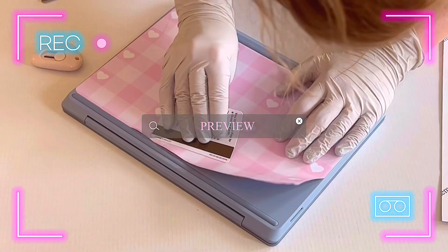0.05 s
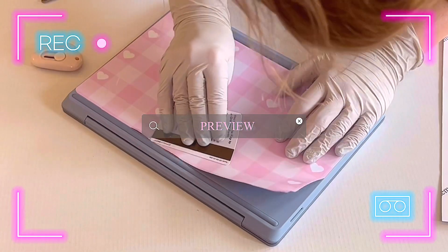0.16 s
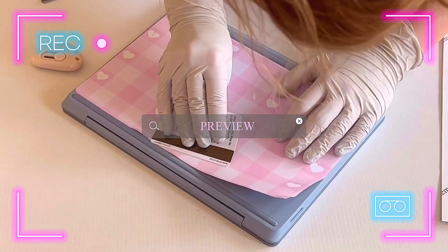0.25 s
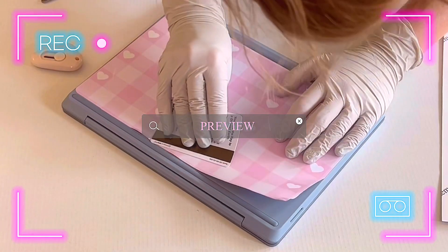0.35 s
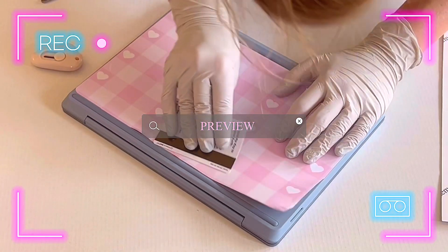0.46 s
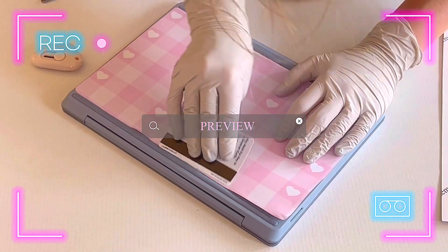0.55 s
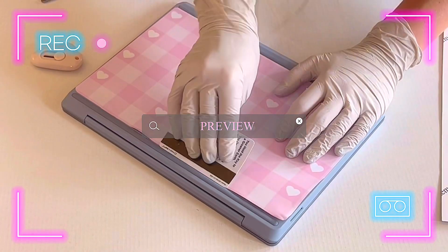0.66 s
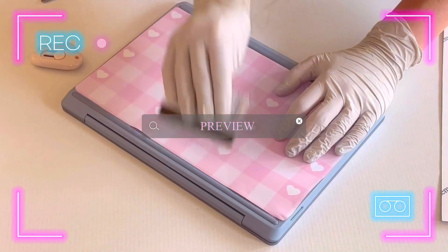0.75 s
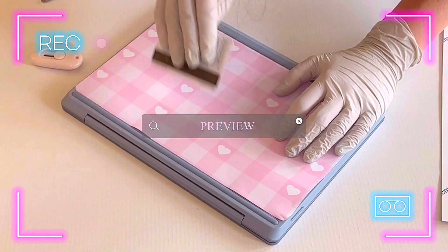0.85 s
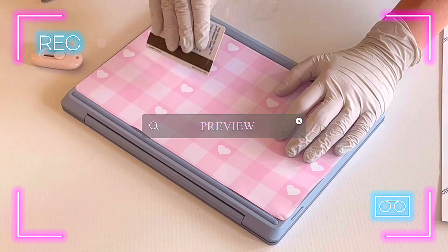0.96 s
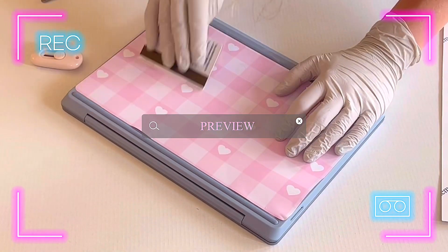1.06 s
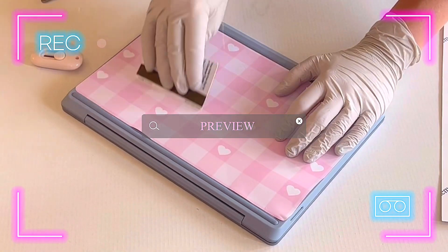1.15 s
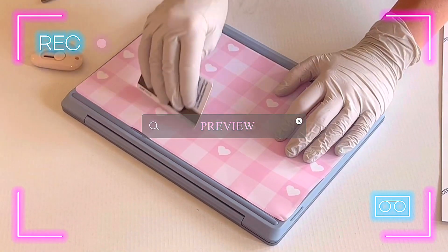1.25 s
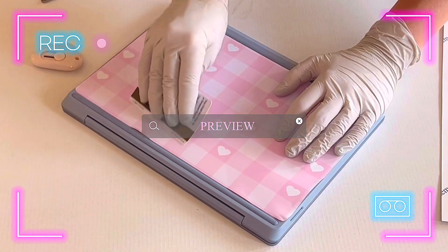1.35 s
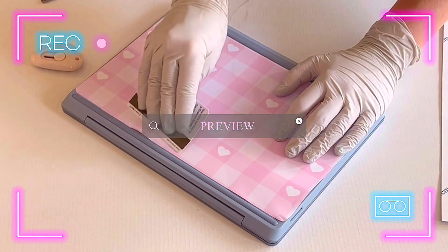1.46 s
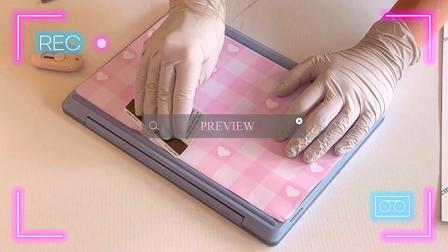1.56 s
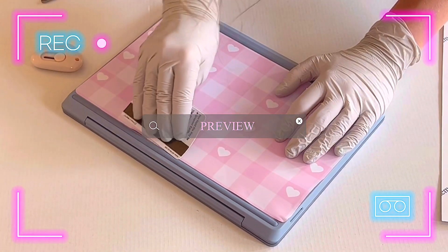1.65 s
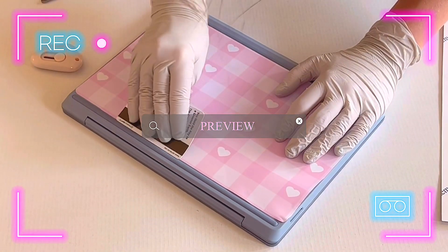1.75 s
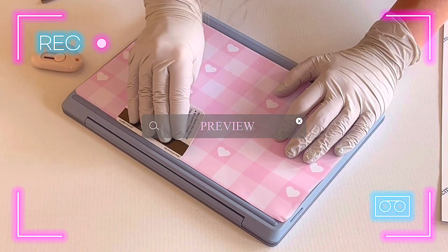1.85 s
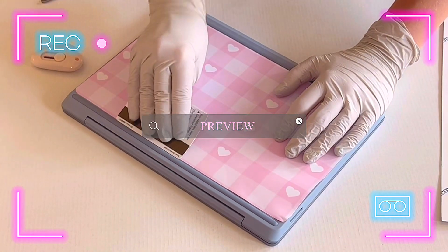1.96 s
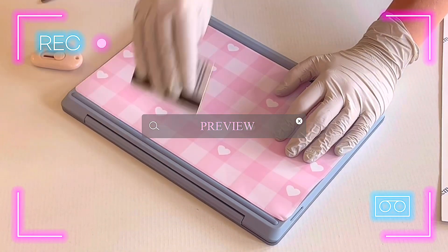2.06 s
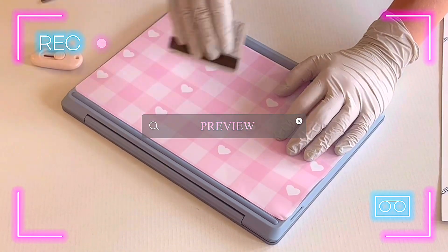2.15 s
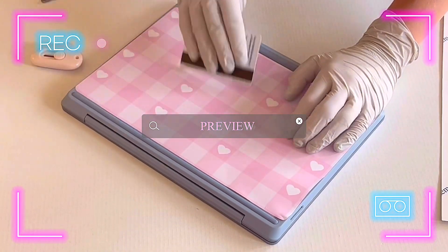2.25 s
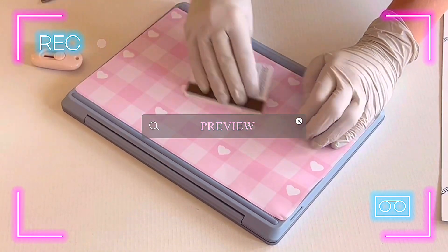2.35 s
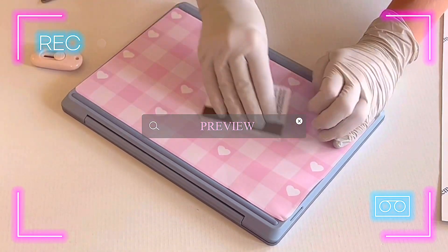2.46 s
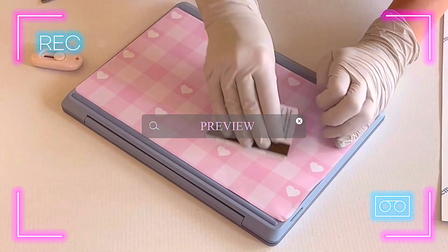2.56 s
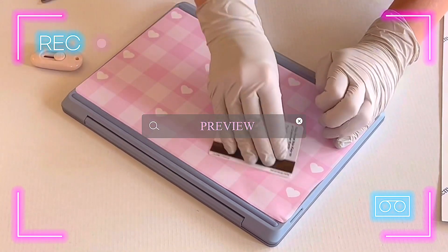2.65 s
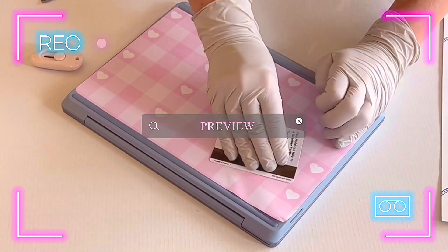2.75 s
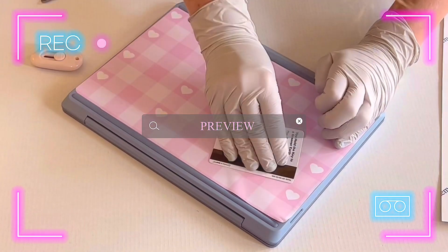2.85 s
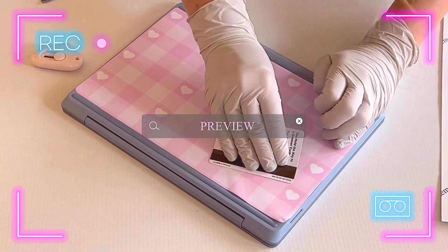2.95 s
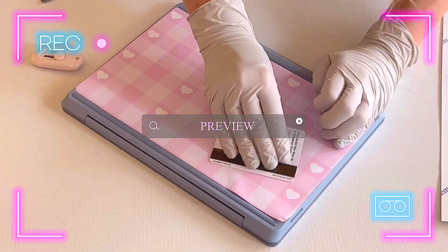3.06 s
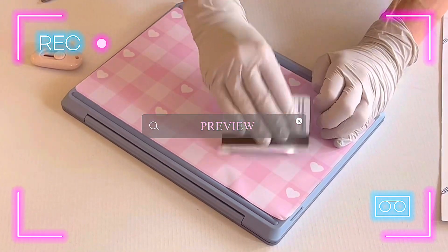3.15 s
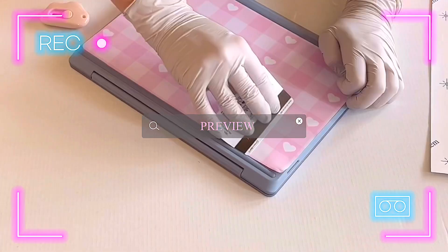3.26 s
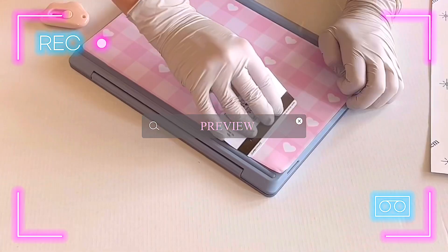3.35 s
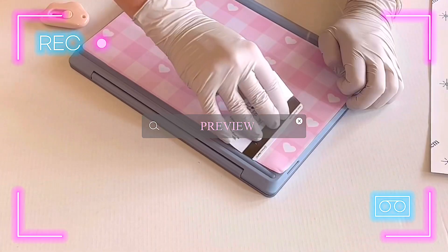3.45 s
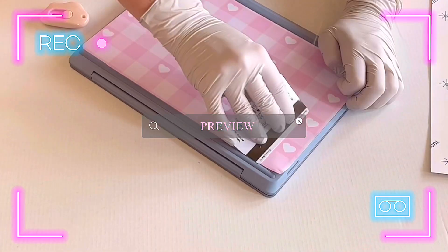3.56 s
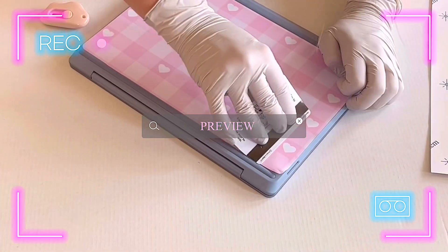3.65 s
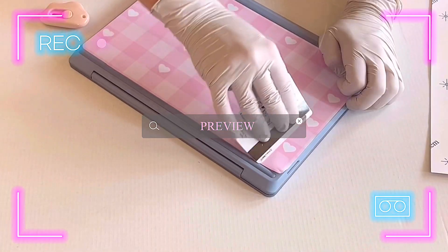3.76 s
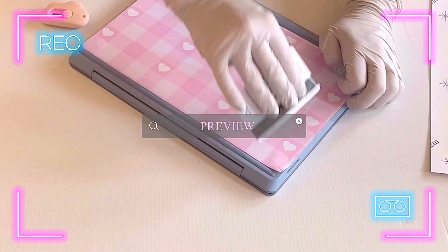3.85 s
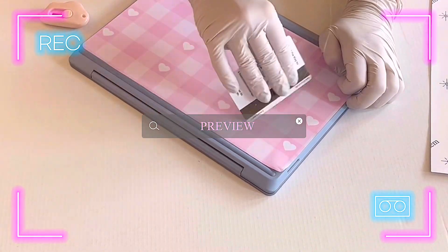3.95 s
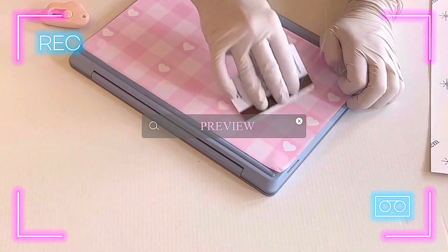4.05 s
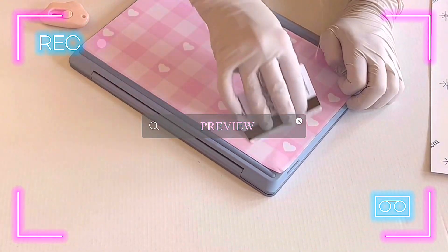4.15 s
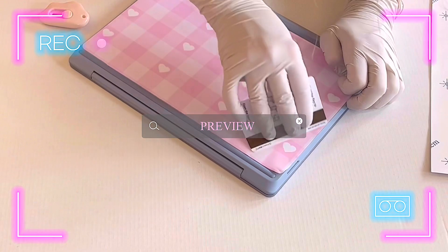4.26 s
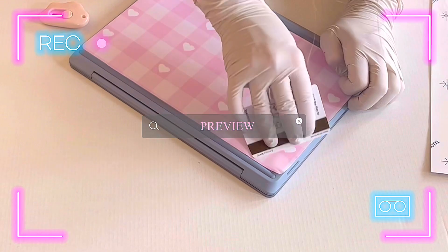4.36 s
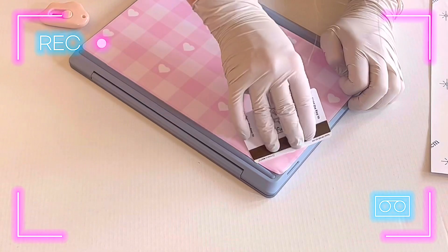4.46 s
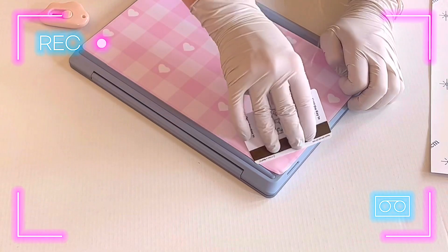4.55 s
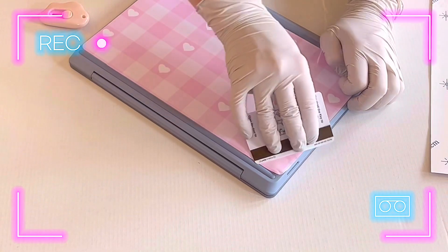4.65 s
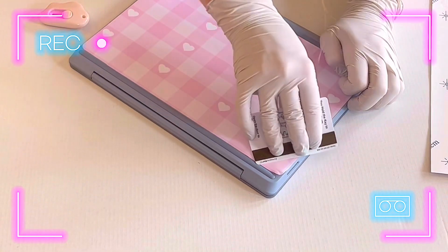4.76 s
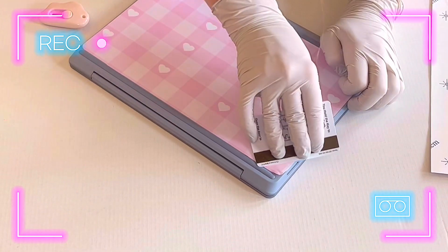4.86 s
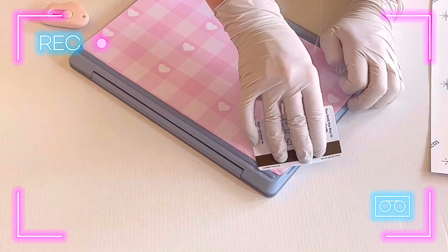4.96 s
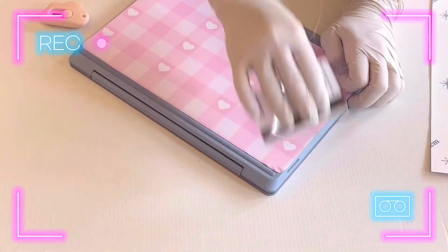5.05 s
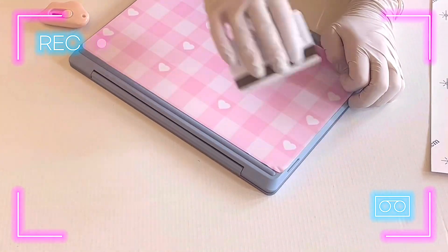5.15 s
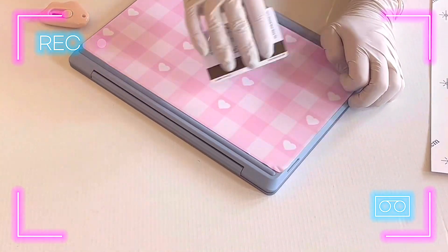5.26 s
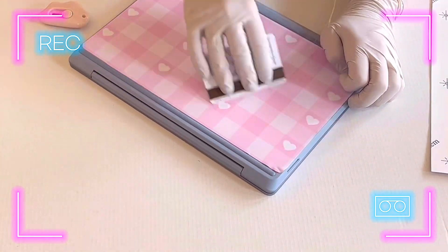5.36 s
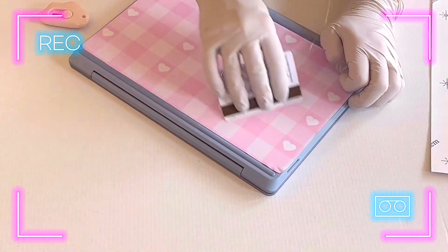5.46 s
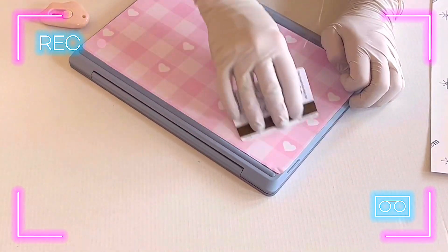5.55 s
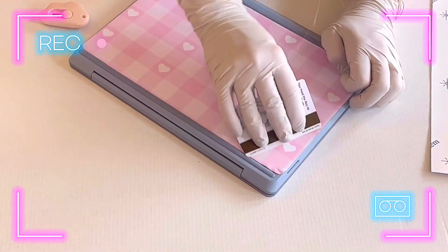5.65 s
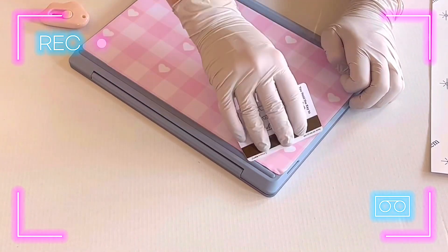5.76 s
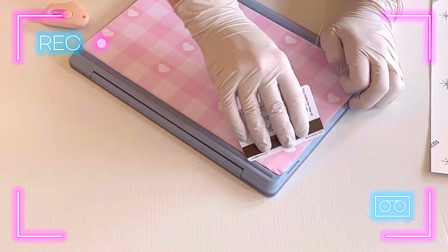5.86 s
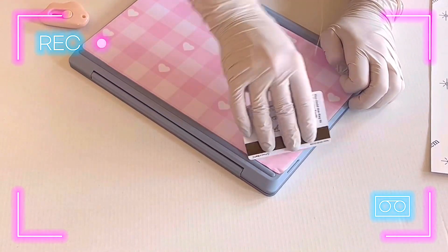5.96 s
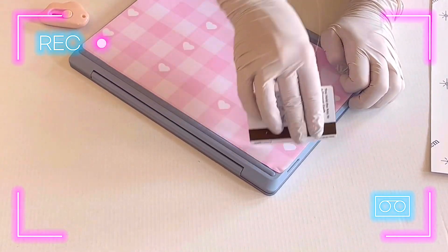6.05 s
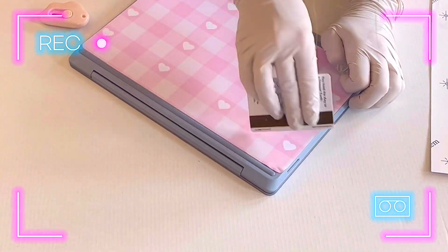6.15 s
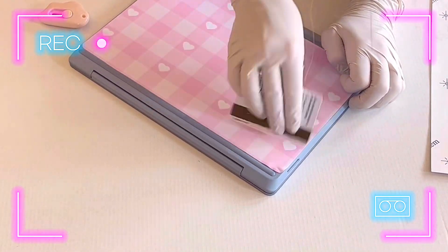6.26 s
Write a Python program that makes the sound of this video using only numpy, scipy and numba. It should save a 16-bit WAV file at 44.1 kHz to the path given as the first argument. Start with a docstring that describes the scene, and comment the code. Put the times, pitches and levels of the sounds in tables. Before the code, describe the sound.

Close up in a small room, a thin plastic card smooths vinyl onto a laptop lid. After a barely audible squeaky press, the loose film slaps shut with a small hollow knock. Then come short hissing scrapes, some hollow and some bright, separated by light flicks and hard little taps, with quieter rubbing between stronger sweeps. A low, slightly wavering appliance hum runs underneath. Close stereo pickup from above, with short reflections.

```python
"""Over a low hum, a faint squeaky press; then a plastic card smooths a vinyl skin onto a laptop lid:
it taps down, scrapes across in short strokes and flicks off, while a loose end of vinyl slaps shut.
Random micro-slips of the edge ring card and lid as resonances; taps and slaps are decaying modes.
A small room with a humming appliance adds echoes from desk and walls, still air and wavering tones;
a phone with two close microphone ports listens from above."""
import sys
import numpy as np
from scipy import signal
from scipy.fft import rfft, irfft, next_fast_len
from scipy.io import wavfile
from scipy.ndimage import uniform_filter1d
from numba import njit

SR = 44100
rng = np.random.default_rng(int(sys.argv[2]) if len(sys.argv) > 2 else 0)


def waveform_to_disk(signal):
    """Save audio, clipped to [-1, 1], as 16-bit WAV at the path in sys.argv[1]."""
    frames = np.transpose(np.atleast_2d(signal))
    scaled = np.clip(frames, -1, 1) * 32767
    samples = np.round(scaled).astype(np.int16)
    wavfile.write(sys.argv[1], SR, samples)


N = 278271
T = np.arange(N) / SR  # time in seconds


def undb(db):
    """Decibels to gain."""
    return 10 ** (np.asarray(db) / 20)


def unit(x):
    """Scale to rms 1."""
    return x / np.sqrt(np.mean(x ** 2))


def colour(points, hz):
    """Level in dB of a spectrum, drawn straight between its points over log frequency."""
    point_hz, point_db = np.transpose(points)
    return np.interp(np.log(hz), np.log(point_hz), point_db)


def bump(hz, centre_hz, width_hz):
    """Bell shape of one resonance, top 1."""
    return 1 / (1 + (2 * (hz - centre_hz) / width_hz) ** 2)


def shape(x, gain):
    """Filter by a gain that is a function of frequency."""
    size = next_fast_len(x.shape[-1] + 2048)
    hz = np.maximum(np.arange(size // 2 + 1) * SR / size, 1)
    return irfft(rfft(x, size) * gain(hz), size)[..., :x.shape[-1]]


def walk(rate):
    """Slow random wander with a spread near 1: random steps at the given rate (Hz), smoothed twice."""
    k = int(SR / rate)
    steps = np.repeat(rng.standard_normal(N // k + 1), k)
    return np.sqrt(2) * uniform_filter1d(uniform_filter1d(steps, k), k)[:N]


def slips(spread_db, judder_db, judder_rate):
    """Dense micro-slips of unequal size, bunched by the judder of the edge."""
    sizes = rng.standard_normal(N) * undb(spread_db * rng.standard_normal(N))
    return unit(sizes * undb(judder_db * walk(judder_rate)))


def ring(modes, t, detune):
    """Decaying modes of a struck body, each shifted a little in pitch at each blow."""
    total = 0
    for hz, db, t60 in modes:
        pitch_hz = hz * (1 + detune * rng.standard_normal())
        decay = np.exp(-np.log(1000) * t / t60)
        total = total + undb(db) * decay * np.sin(2 * np.pi * pitch_hz * t)
    return total


def effort(t, rise, hold, slowing, swell_db, rise_power=2.13, ease_s=0.0098):
    """Level in dB of one push: it gathers speed, changes by the swell over the hold, then slows."""
    attack = np.sin(np.pi / 2 * np.clip(t / rise, 1e-3, 1)) ** rise_power
    to_go = np.clip((rise + hold - t) / hold, 0, 1)
    past = np.maximum(t - rise - hold, 0)
    # the slowing eases in rather than starting with a corner
    slowed_s = np.hypot(past, ease_s) - ease_s
    return 20 * np.log10(attack) - swell_db * to_go ** 2 - slowing * slowed_s


def scrape(lid_hz=1400, hiss_hz=4600, lid_db=-3.0, card_db=-1.8, hiss_db=-0.96,
           near_s=0.0009, far_s=.00321, travel=0.001546, rim_echo=.24,
           rumble_hz=350, grit_hz=11000, apart_db=-8, apart_hz=4000,
           lid_per_db=0.74, hiss_per_db=1, lean_lid_db_per_s=12.5, lean_hiss_db_per_s=-15,
           ring_width_hz=18, ring_db=1.5):
    """Each push rings the lid below, the card in the middle and hisses on top; friction drives all three."""
    # colour of the sliding edge: hz, level_db
    edge_colour = [(200, -16.5), (450, -8), (620, -8.2), (780, -5), (1000, -2.5), (1400, -3), (2500, 2.5),
                   (3700, 1), (4900, -4.5), (6200, -1), (7500, -14), (10000, -19.5), (12000, -21.3),
                   (15500, -22.5)]
    # resonances of card and lid under the sliding edge: centre_hz, width_hz, height_db
    resonances = [(690, 100, -0.5), (1320, 260, 2), (1830, 280, 4), (2020, 100, -1), (3090, 320, 1.5),
                  (4700, 340, 0.5), (6060, 1050, -5.5)]
    # narrow rings of the lid, the same under every stroke: centre_hz
    rings_hz = [1296, 1481, 1605, 1713, 1820, 2234, 2393, 2990, 3402, 3782, 3947, 4606]
    # where and how the edge presses, by name: lid_resonance_hz, its height_db, card_resonance_hz,
    # its height_db, lid_rumble_db, finest_grit_db, left_over_right_db
    contacts = { "first press": (1560, 5, 3750, 6, -13.5, 7, 1.5),
                "laying down": (1333, 12, 3101, 2.5, -6, 7, 1),
                "long sweep, upright": (1202, 3, 2950, 2, -7, 14, 1),
                "long sweep": (1202, 2, 1530, 4, -6.5, 5.5, 1.5),
                "hinge side": (1450, 11, 3070, 6.5, 6.8, 1.7, 2),
                "middle sweep, upright": (1600, 2, 3300, 3, 6, 13, 0.5),
                "middle sweep": (1438, 3, 2050, -2, 1, 5.5, 0),
                "front rim": (830, 8, 1860, 4.8, 10, -1, 0.5),
                "side sweep": (2046, 2.5, 3880, 8.5, -1, 3.5, -0.4),
                "slow rub": (1366, 5.5, 3700, 6.5, 7, -5, 0),
                "off the corner": (520, 15, 4600, 14, 14, 21, 2),
                "corner sweep": (920, -2.5, 3820, 4.5, -3.5, 3.5, -0.2),
                "corner press": (1252, 5.5, 1750, 6.5, 16, 10, 0),
                "last touch": (670, 9.3, 1400, 8.2, 6.7, 9.1, 1), }
    # each push of the card: contact name, start_s, rise_s, hold_s, slowing_db_per_s, level_db,
    # swell_over_hold_db, lid_re_level_db, hiss_re_level_db
    pushes = [ ("first press", 0, .01, 0.14, 190, -76, -0.92, -8, -11.5),
              ("laying down", .356, 0.14, 0.067, 470, -59, 3.1, -8, -10.5),
              ("laying down", 0.57, 0.0083, 0.023, 290, -68, 0, 2.4, -22),
              ("long sweep, upright", 1.004, .003, .012, 150, -60, 0, -4.5, -9),
              ("long sweep, upright", 1.0064, 0.048, 0.017, 134, -51.5, 1, -16.5, -2.8),
              ("long sweep", 1.087, 0.091, 0.082, 260, -49.5, 3.1, -0.59, -13.5),
              ("long sweep", 1.2245, 0.062, 0.013, 143, -46.5, 0, -8.5, -8),
              ("hinge side", 1.37, 0.051, 0.12, 330, -58.5, 2.4, -1, -15.5),
              ("hinge side", 1.51, .02, .01, 330, -60, 0, -8, -16),
              ("hinge side", 1.617, 0.064, 0.03, 470, -59, 2.1, -2, -17),
              ("middle sweep, upright", 2.255, .035, .015, 95, -56, 0, -14.5, 1.3),
              ("middle sweep", 2.2474, 0.0048, 0.34, 178, -47.5, 11.2, -11, -7),
              ("front rim", 3.204, 0.007, 0.012, 148, -61, 0, 3.1, -11.5),
              ("front rim", 3.319, 0.1, 0.122, 360, -61.6, 0, 1.5, -11.5),
              ("side sweep", 3.963, 0.01, 0.038, 100, -67.5, .5, 6.7, -5.5),
              ("side sweep", 4.027, 0.062, 0.095, 190, -43, 3.1, -14.5, -12.5),
              ("side sweep", 4.177, .133, .052, 303, -51.5, 3.2, -2.2, -13.5),
              ("slow rub", 4.6, 0.082, 0.022, 92, -69, 0, -10, -12),
              ("slow rub", 4.784, 0.092, 0.094, 240, -69.5, .5, -15, -11),
              ("off the corner", 5.037, 0.0042, 0.01, 260, -68, 0, -1, -3.5),
              ("corner sweep", 5.328, 0.005, 0.23, 194, -45, 10.2, -12, -7),
              ("corner sweep", 5.55, 0.052, 0.026, 275, -47, 0, -11, -13.5),
              ("corner sweep", 5.61, 0.068, 0.018, 370, -57.5, 1, 0, -16.5),
              ("corner press", 5.821, 0.087, 0.019, 530, -61.5, 2.3, 0.6, -25),
              ("last touch", 6.215, 0.0045, 0.066, 270, -72, 0, 1, -6), ]
    out = np.zeros((2, N))
    own = shape(rng.standard_normal((2, N)), lambda f: 1 / np.hypot(1, (apart_hz / f) ** 2))
    for contact, start, rise, hold, slowing, level, swell, push_lid_db, push_hiss_db in pushes:
        hollow_hz, hollow_db, bite_hz, bite_db, rumble_db, grit_db, left_db = contacts[contact]
        friction = slips(spread_db=2.5, judder_db=0.8, judder_rate=260)
        span = (T >= start) & (T <= start + rise + hold + 50 / slowing)
        t = T[span] - start

        # waves return from two rims of the lid; the card leaves one and nears the other,
        # so the colour shifts; travel is seconds of echo lag per second since the contact began
        landed = min(row[1] for row in pushes if row[0] == contact)
        moved = travel * (T[span] - landed)
        near_echo = np.interp(T[span] - (near_s + moved), T, friction)
        far_echo = np.interp(T[span] - (far_s - moved), T, friction)
        x = friction[span] + rim_echo * (near_echo + far_echo)
        # the edge is long, so in the treble each port hears a part of it alone
        x = x + undb(apart_db) * own[:, :len(t)]

        modes = [*resonances, *((hz, ring_width_hz, ring_db) for hz in rings_hz),
                 (hollow_hz, hollow_hz / 2.5, hollow_db), (bite_hz, bite_hz / 5, bite_db),
                 (rumble_hz, rumble_hz, rumble_db), (grit_hz, grit_hz / 2, grit_db)]
        x = shape(x, lambda f: undb(colour(edge_colour, f)
                                    + sum(db * bump(f, hz, width) for hz, width, db in modes)))
        low = shape(x, lambda f: 1 / (1 + (f / lid_hz) ** 6))
        high = shape(x, lambda f: 1 / (1 + (hiss_hz / f) ** 10))
        middle = x - low - high

        # a slow edge sounds hollow, a fast one bright: the lid follows the push by less
        push_db = effort(t, rise, hold, slowing, swell)
        # the card leans over during a push, so the lid gains and the hiss fades
        lean_s = t - rise - hold
        lid_level = push_lid_db + lid_db + lid_per_db * push_db + lean_lid_db_per_s * lean_s
        hiss_level = push_hiss_db + hiss_db + hiss_per_db * push_db + lean_hiss_db_per_s * lean_s
        sound = (unit(low) * undb(lid_level)
                 + unit(middle) * undb(card_db + push_db)
                 + unit(high) * undb(hiss_level))
        out[:, span] += undb(level + np.array([[left_db], [-left_db]]) / 2) * sound
    return out


@njit
def band(x, hz, share):
    """Band-pass with a moving centre and a width that is a share of it; gain 1 at the centre."""
    y, b, l = np.empty(len(x)), 0., 0.
    for i in range(len(x)):
        g = np.tan(np.pi * hz[i] / SR)
        v = (b + g * (x[i] - l)) / (1 + g * (g + share))
        b, l, y[i] = 2 * v - b, l + 2 * g * v, share * v
    return y


def sweep(x, width=0.21):
    """Sliding resonances of the lid swell and fade as the edge travels over it."""
    # resonances sliding in pitch: start_s, end_s, first_hz, last_hz, height_db
    slides = [(1.063, 1.327, 2000, 910, 6), (1.15, 1.32, 950, 450, 3.5), (1.13, 1.36, 2700, 3400, 2),
              (2.252, 2.744, 3450, 1160, 5), (2.38, 2.72, 5800, 6940, 4.5), (3.055, 3.12, 3200, 2700, 3),
              (3.06, 3.125, 5400, 5900, 2.5), (3.21, 3.6, 3900, 4400, 2.5), (4.06, 4.194, 6600, 5800, 4.5),
              (4.12, 4.44, 3300, 2080, 3), (4.66, 5.02, 3200, 4600, 3), (5.468, 5.623, 5400, 4300, 3.5),
              (5.55, 5.76, 3200, 1990, 3)]
    out = x.copy()
    for start, end, first_hz, last_hz, db in slides:
        span = (T >= start) & (T < end)
        along = (T[span] - start) / (end - start)
        hz = first_hz * (last_hz / first_hz) ** along
        boost = (undb(db) - 1) * np.sqrt(np.abs(np.sin(np.pi * along)))
        out[:, span] += boost * np.array([band(port[span], hz, float(width)) for port in x])
    return out


def flicks(pivot_hz=3500):
    """Quick, light skids of the edge over the vinyl as the card lifts or turns: bright and gritty."""
    # each flick: start_s, rise_s, hold_s, fall_s (time constant), level_db, tilt_db_per_octave,
    # card_resonance_hz, its height_db
    flick_list = [(0.681, 0.019, 0.016, 0.014, -46.5, 0, 1450, 6),
                  (1.971, 0.019, 0.012, 0.016, -44.7, 1.8, 8000, 2),
                  (3.052, 0.022, 0.034, 0.009, -56.5, -3.2, 1800, 4),
                  (3.111, 0.014, .019, .009, -59.5, -2.4, 4500, 5.5),
                  (3.784, 0.014, 0.018, 0.0046, -69, -6, 2980, -1),
                  (3.805, 0.022, 0.007, 0.005, -57.5, 0.3, 4200, 7.5),
                  (4.422, 0.019, .008, .014, -67.5, -8, 5000, 10),
                  (4.659, 0.0036, 0.0071, 0.011, -65.5, -7, 3900, 15),
                  (5.031, .004, .001, .002, -54, 0, 4500, 5),
                  (5.99, 0.011, 0.026, .012, -61.3, -4, 1420, 6),
                  (6.037, 0.0082, .003, .004, -62, -5, 4070, 8),
                  (6.266, 0.01, 0.0056, 0.012, -49.8, -4, 2200, 5)]
    # colour of a flick: hz, level_db
    flick_colour = [(300, -32), (550, -17), (750, -11.5), (1000, -12.5), (1350, 0), (2150, -5.5), (2950, 3),
                    (3600, 1.5), (5500, 0), (6300, 2), (7200, -1.5), (9000, -3.5), (11000, -3), (15500, -9)]
    # clear of the lid, the card rings on briefly: centre_hz, width_hz, level_db
    free_rings = [(2980, 35, -8), (4250, 50, -11), (6350, 60, -6)]
    friction, out = slips(spread_db=3, judder_db=1.6, judder_rate=300), np.zeros(N)
    for start, rise, hold, fall, db, tilt, ring_hz, ring_db in flick_list:
        span = (T >= start) & (T < start + .5)
        t = T[span] - start
        speed = np.minimum(t / rise, 1) ** 2 * np.exp(-np.maximum(t - rise - hold, 0) / fall)
        # the tilt acts from 1 kHz up
        x = shape(friction[span], lambda f: undb(
            colour(flick_colour, f)
            + tilt * np.log2(np.maximum(f, 1000) / pivot_hz)
            + ring_db * bump(f, ring_hz, ring_hz / 8)))
        out[span] += undb(db) * speed * unit(x)
    return shape(out, lambda f: 1 + sum(undb(db) / (1 + 2j * (f - hz) / width)
                                        for hz, width, db in free_rings))


def taps(crack_db=-12, crack_s=0.0013, snap_db=-20, snap_s=0.0017, hard_hz=5000, card_low_hz=800,
         lid_lag_s=0.00097, spot_t60=.016):
    """Knocks of the edge: a crack and the card's short ring, dulled by a soft contact, over a lid thump."""
    # each tap: time_s, level_db, contact_cutoff_hz, lid_thump_db, card_pitch_factor,
    # contact_build_s, struck_spot_hz, struck_spot_db
    tap_list = [(1.0047, -35.5, 6000, -13, 0.97, 0.00083, 1700, -24),
                (2.2513, -36.5, 6100, -4.5, 1.2, 0.00062, 850, -18),
                (3.2078, -36.5, 4300, -5, 1.1, 0.0006, 780, -18),
                (3.833, -40, 6000, -22, 1.15, .0005, 1500, -26),
                (3.9624, -22.7, 5400, -17.5, 0.96, .0009, 1150, -25),
                (5.0361, -24, 5100, -23, 1.03, 0.00043, 1450, -28),
                (5.3302, -22, 5240, -13.5, 1.4, 0.00045, 500, -19),
                (6.2132, -33, 3600, -11.5, .92, 0.00062, 1400, -24)]
    # modes of the lid: hz, level_db, t60_s
    lid_modes = [(126, -17.5, 0.14), (194, -12.5, 0.031), (324, -19, 0.039), (397, -20.5, 0.038),
                 (538, -17.5, 0.032), (750, -11, 0.02), (943, -15, 0.04), (1260, -32, 0.006)]
    # modes of the card at pitch factor 1: hz, level_db, t60_s
    card_modes = [(1520, -11, 0.0051), (1850, -39, 0.0073), (2510, -7.5, 0.0029), (3310, -8.5, 0.0071),
                  (4140, -9, 0.0061), (6210, -12.5, 0.0051)]
    out, t = np.zeros(N), T[:SR // 5]
    for s, db, contact_hz, thump_db, pitch, press_s, spot_hz, spot_db in tap_list:
        noise = rng.standard_normal(len(t))
        click = ring(card_modes, t * pitch, detune=0.019) + undb(crack_db) * np.exp(-t / crack_s) * noise
        click = signal.lfilter(*signal.butter(2, min(contact_hz, SR / 3), fs=SR), click)
        # the harder the contact, the more the very edge snaps
        snap = undb(snap_db) * (contact_hz / hard_hz) ** 2 * np.exp(-t / snap_s) * noise
        # the card is too small to radiate bass; that comes from the lid
        card = signal.lfilter(*signal.butter(2, card_low_hz, "high", fs=SR), click + snap)
        # the heavier lid answers just after the card
        lid = ring(lid_modes, np.maximum(t - lid_lag_s, 0), detune=0.096)
        # each place on the lid has a ring of its own
        spot = ring([(spot_hz, spot_db, spot_t60)], t, detune=0)
        contact_build = np.minimum(t / press_s, 1)
        blow = undb(db) * ((card + spot) * contact_build + undb(thump_db) * lid)
        i = int(s * SR)
        out[i:i + len(t)] += blow[:N - i]
    return out


def slaps(close_s=0.00075, crack_db=-17.5, crack_s=.001, crack_hz=3000):
    """Round, cushioned knocks with a small crack: the vinyl squeezes out the last pocket of air."""
    # the loose end of the vinyl slaps shut on the lid and bounces once: time_s, level_db
    slap_list = [(0.5777, -28), (0.5866, -40)]
    # hollow ring of the air trapped under it: hz, level_db, t60_s
    pocket_modes = [(645, -18, 0.015), (1280, 0.5, 0.0067), (1700, -6, .005), (2370, -10, 0.0043)]
    out, t = np.zeros(N), T[:SR // 10]
    for s, db in slap_list:
        burst = rng.standard_normal(len(t)) * np.exp(-t / crack_s)
        crack = signal.lfilter(*signal.butter(2, crack_hz, fs=SR), burst)
        hollow = ring(pocket_modes, t, detune=.01) * np.minimum(t / close_s, 1) ** 2
        i = int(s * SR)
        out[i:i + len(t)] += undb(db) * (hollow + undb(crack_db) * crack)
    return out


def squeak(at_s=0.17, half_s=0.086, pitch_hz=7150, db=-81, waver=0.022):
    """A faint squeak under the first slow press: one tone wavering in pitch and level."""
    # the pitch wavers slowly and fast, each by a share of itself
    phase = 2 * np.pi * np.cumsum(pitch_hz * (1 + waver * walk(36) + waver * walk(620))) / SR
    return undb(db + 3 * walk(60)) * np.exp(-((T - at_s) / half_s) ** 2) * np.sin(phase)


def faint_swells(width=0.41):
    """Faint short swells of hiss around the strokes: noise in one broad band that rises and fades."""
    # each swell: time_s, half_length_s, band_centre_hz, level_db
    swell_list = [(0.777, 0.02, 2980, -74), (2.093, 0.056, 5700, -73.5), (2.22, 0.08, 7140, -80),
                  (3.885, 0.04, 4560, -75.5), (5.003, .014, 11000, -82), (5.151, .009, 1930, -78),
                  (5.244, 0.0052, 3230, -79.5), (5.297, 0.03, 4300, -83), (6.14, 0.016, 3550, -79.5)]
    out = np.zeros(N)
    for s, half_s, centre_hz, db in swell_list:
        span = np.abs(T - s) < 3 * half_s
        x = shape(rng.standard_normal(N)[span], lambda f: bump(f, centre_hz, width * centre_hz))
        out[span] += undb(db) * unit(x) * np.exp(-((T[span] - s) / half_s) ** 2)
    return out


def reflections(x, t60, wet_db, gap_s, dull_hz):
    """A diffuse, decaying tail of echoes, different at each port and duller than the source."""
    t = T[:SR // 2]
    # silent for the gap, then building over as long again
    build = np.clip(t / gap_s - 1, 0, 1)
    tail = rng.standard_normal((2, len(t))) * np.exp(-np.log(1000) * t / t60) * build
    tail /= np.sqrt(np.sum(tail ** 2, axis=1, keepdims=True))
    wet = signal.fftconvolve(x[None], tail, axes=1)[:, :N]
    return undb(wet_db) * shape(wet, lambda f: 1 / np.hypot(1, f / dull_hz))


def background(air_db=-61.0, side_db=1, waver_db=.5, wander=0.04, steady_hz=80, apart_hz=600, apart=1.1):
    """A slightly wavering hum over soft rumble, a little to the left; the bass is alike at both ports."""
    # hum of a compressor and the mains: hz, level_db (rms)
    hum_lines = [(59, -75.5), (82.3, -51.5), (116.6, -68), (120, -72.5), (123.4, -58.8), (177, -79.5),
                 (206, -81)]
    # still air of the room: hz, relative level_db
    air_colour = [(20, -15.5), (35, -7), (60, 2), (85, 3), (135, 2), (170, -6.5), (250, -13.5), (400, -21),
                  (700, -29.5), (1200, -36), (2500, -41), (7000, -46), (12000, -50.5), (15500, -55)]
    hum = 0
    for hz, db in hum_lines:
        # the higher lines are the less steady; waver (dB) and wander (radians) hold at steady_hz
        unsteady = (hz / steady_hz) ** 2
        level = np.sqrt(2) * undb(db + waver_db * unsteady * walk(7.8))
        phase = 2 * np.pi * (hz * T + rng.random()) + wander * unsteady * walk(6.9)
        hum = hum + level * np.sin(phase)
    mid, side = shape(rng.standard_normal((2, N)), lambda f: undb(colour(air_colour, f)))
    side = shape(side, lambda f: apart * f / (f + apart_hz) / np.hypot(1, (f / 4000) ** 2))
    sides = np.array([[1], [-1]])
    air = undb(air_db) * (mid + sides * side) / np.std(mid)
    # the left gains side_db and the right loses as much
    return (hum + air) * undb(side_db * sides)


def scene(lifted_db=4):
    """The card's sounds, echoes from desk and walls, and the background."""
    pressed = sweep(scrape()) + taps() + slaps() + squeak() + faint_swells()
    lifted = sweep(flicks()[None])[0]
    pressed_mono = pressed.mean(axis=0)
    desk = reflections(pressed_mono + lifted, t60=0.098, wet_db=-6.5, gap_s=0.001, dull_hz=4800)
    # clear of the lid, the card radiates more freely into the room
    walls = reflections(pressed_mono + undb(lifted_db) * lifted,
                        t60=0.27, wet_db=-11.0, gap_s=0.0093, dull_hz=8200)
    return pressed + lifted + desk + walls + background()


def record(dry, low_cut_hz=17, top_hz=15500):
    """The ports drift apart in phase towards the treble and ripple in level; deep rumble and top are cut."""
    # the left port against the right: hz, phase_lead_radians, level_db
    ports = [(0, 0, 0), (500, 0, 0), (1000, 0, 1), (2000, 0, 0), (3000, .85, -.7), (3800, 1, -1),
             (4400, .8, .8), (5000, .1, 1.6), (5500, -.9, .3), (6800, -1, 1), (7700, -2.9, 0),
             (8900, -3.4, 0), (10300, -5.2, 0), (12000, -6.3, -.3), (13500, -7.4, -.3), (15500, -9.9, 0)]
    port_hz, lead, left_db = np.transpose(ports)
    half = np.array([[.5], [-.5]])  # each port takes half of the difference
    pair = shape(dry, lambda f: np.exp(1j * half * np.interp(f, port_hz, lead))
                 * undb(half * np.interp(f, port_hz, left_db)))
    pair = shape(pair, lambda f: 1 / np.hypot(1, (low_cut_hz / f) ** 2))
    return signal.sosfilt(signal.ellip(10, .2, 70, top_hz, fs=SR, output="sos"), pair)


dry = scene()
out = record(dry)
waveform_to_disk(out)
```